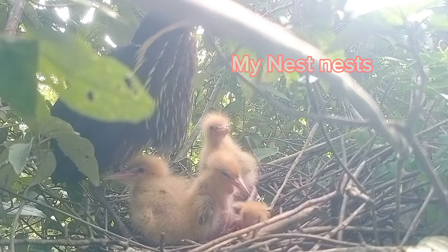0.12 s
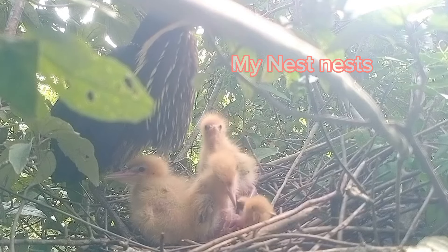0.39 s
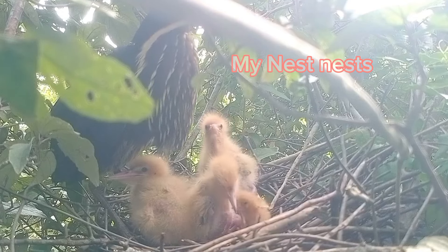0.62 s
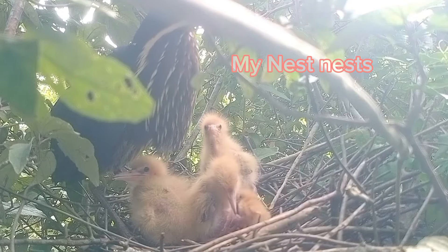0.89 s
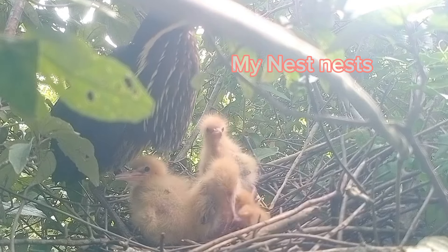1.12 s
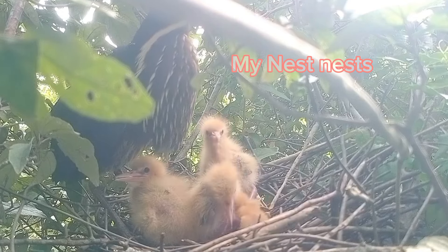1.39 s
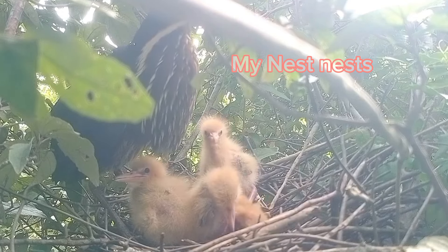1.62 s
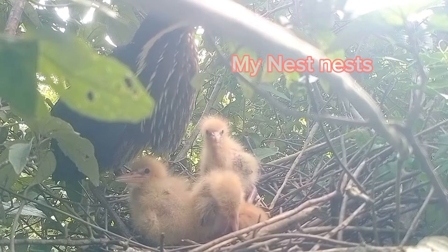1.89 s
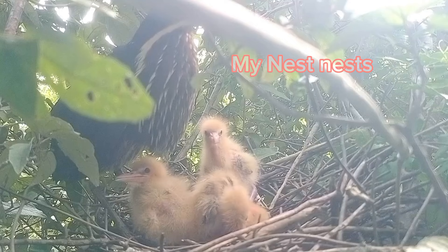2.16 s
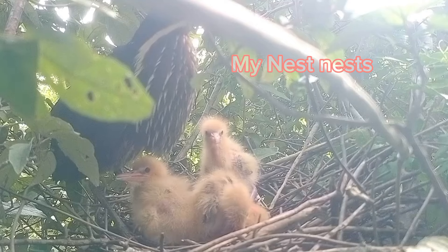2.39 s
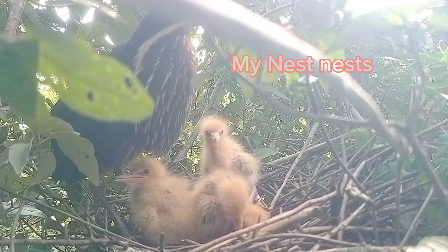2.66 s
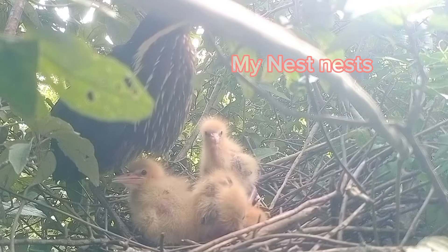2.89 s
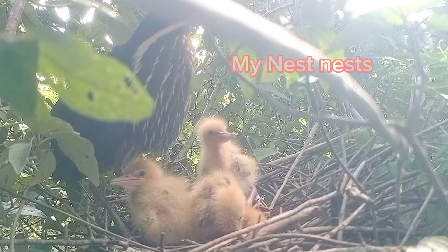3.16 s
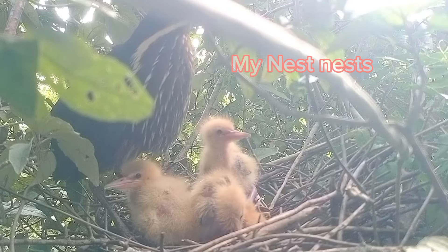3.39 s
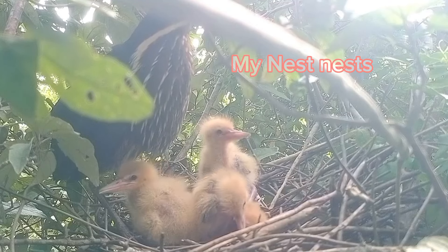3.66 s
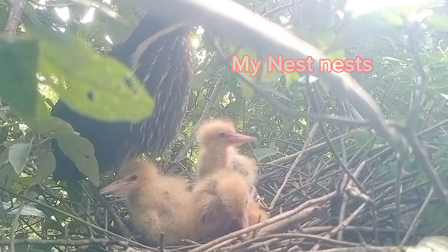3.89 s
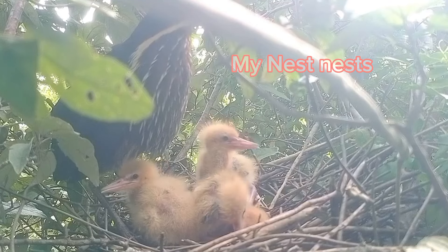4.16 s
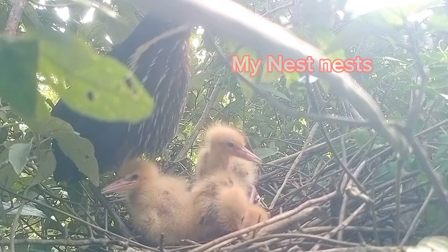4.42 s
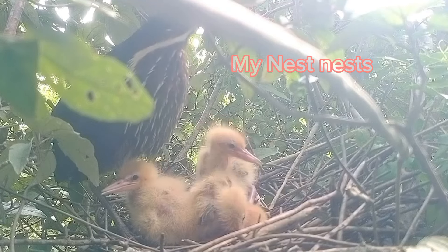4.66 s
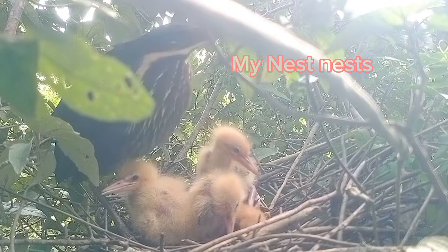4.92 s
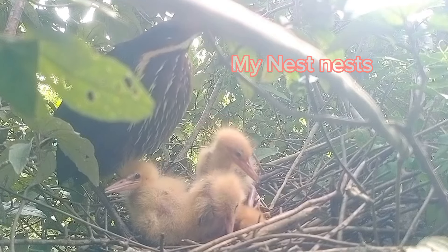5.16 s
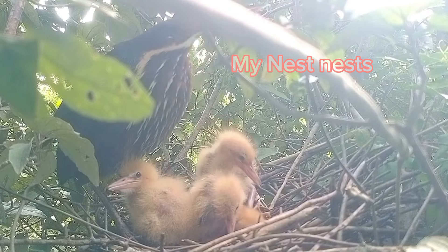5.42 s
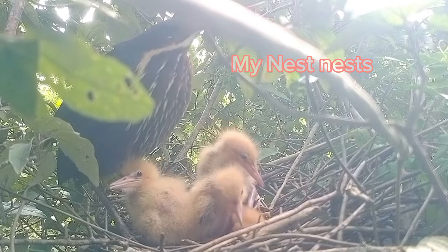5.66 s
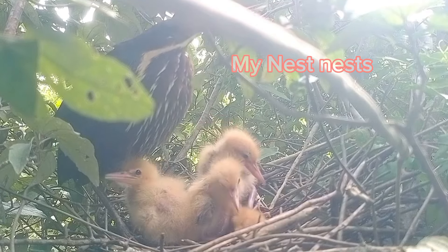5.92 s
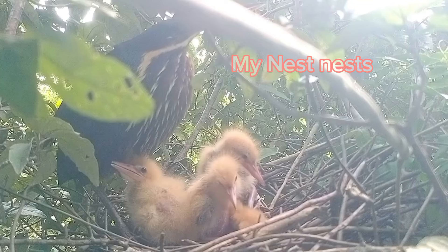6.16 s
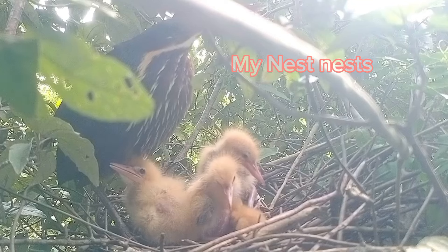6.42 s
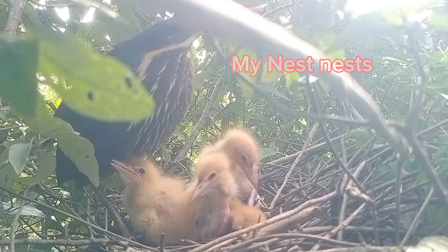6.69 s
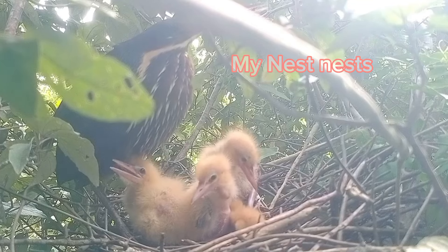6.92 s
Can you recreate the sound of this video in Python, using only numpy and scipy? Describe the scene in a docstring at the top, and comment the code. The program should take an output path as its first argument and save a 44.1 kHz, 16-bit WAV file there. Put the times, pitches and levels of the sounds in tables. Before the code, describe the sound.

High, steady cicada buzzing shimmers outdoors as close birds chack, chirp and burr irregularly, with a brief dry ratchet and faint low wind rumble.

```python
"""A cicada chorus drones and throbs in a leafy thicket on a hot day: dense clicks ring one body resonance.
Small birds nearby chack, whistle, burr and peep, as gliding tones and rasps through throat resonances.
A dry ratchet of ringing clicks and spurts of pulsed buzz cut in. A far bird pips in steady time, mostly as
echoes; faint twitter and a few far insect trills are narrow noise. A treble hiss flickers; below lie gusty
rumble and leaf hiss, made of coloured noise."""
import sys
import numpy as np
from scipy import signal
from scipy.fft import rfft, irfft, next_fast_len
from scipy.io import wavfile

SR = 44100
rng = np.random.default_rng(int(sys.argv[2]) if len(sys.argv) > 2 else 0)


def dump(signal):
    """Clip the signal to [-1, 1] and save it as 16-bit WAV at the path in sys.argv[1]."""
    limited = np.clip(np.atleast_2d(signal).T, -1, 1)
    pcm = np.round(limited * 32767).astype(np.int16)
    wavfile.write(sys.argv[1], SR, pcm)


def elevation(decibels):
    """Turn decibel levels (scalar or array-like) into linear amplitude ratios."""
    levels = np.asarray(decibels, float)
    return 10 ** (levels / 20)


N = 310905  # length in samples

# Spectrum of the cicada body. Each row: frequency in Hz, relative density in dB per Hz.
CICADA_BODY = [(3820, -76), (6500, -37), (6740, -10), (6830, -16), (6920, -20.5), (7110, 6), (7390, 10.5),
               (7590, 14), (7980, -7.5), (8150, -13), (8270, -14), (8790, -26.5), (9200, -115.5),
               (12000, -143), (20200, -120)]
# Nearer cicadas, standing out as narrow peaks. Each row: frequency in Hz, width in Hz, level in dB.
NEAR_SINGERS = [(7130, 180, -15.5), (7300, 100, -18.5), (7230, 63, -19), (7750, 52, -16.5),
                (7760, 42, -12.5), (7811, 88, -10.5)]
# Throbs of the whole chorus, at several paces. Each row: throbs per second, lag in throbs, power depth 0-1.
THROBS = [(11.39, 0.32, .3), (11.6, 0.35, 0.11), (11.8, 0.6, 0.1), (12.35, 0.23, 0.15)]
CHORUS_DB, CHORUS_DRIFT_DB, CHORUS_FLUTTER_DB = -44.5, 0.7, 0.5  # level, slow drift, quick flutter

# Harsh chacks. Each row: start in seconds, level in dB, middle resonances in dB, top resonances in dB.
CHACKS = [(0.888, -30.5, -3.5, -10), (1.3611, -33.5, -5, -7), (2.333, -35, 1.5, -3), (2.722, -29, -4, -7),
          (3.1196, -27, -7.5, -4.5), (4.1469, -28.5, -6.5, -9), (4.59, -30.5, -7, -8),
          (5.8871, -32, -6.5, -6), (6.272, -36, -4, -1.5), (6.6081, -30.5, -3.5, -3.5),
          (7.033, -31, 0.5, 0)]
# Chack throat, in low, middle and top groups. Each row: frequency in Hz, width in Hz, level in dB.
CHACK_THROAT = [
    [(2050, 480, -4.5), (2500, 420, 5.5), (2907, 310, 4.5)],
    [(4210, 370, -1), (4625, 300, 6)],
    [(5690, 130, -3.5), (6100, 150, 1.5)],
]
CHACK_S, CHACK_TONE_DB = 0.043, -43  # length in seconds; level of the opening tone

# Rising whits. Each row: start in seconds, start in Hz, end in Hz, level in dB, overtones in dB.
WHITS = [(.540, 1604, 2544, -30, -14), (.982, 2160, 2305, -40, -25), (1.848, 1510, 2394, -33, -18),
         (2.353, 2056, 2596, -28.5, -18), (3.718, 2050, 2580, -30.5, -25), (3.834, 1550, 2180, -32.5, -4),
         (4.978, 1960, 2640, -33.5, -22), (5.077, 1536, 1950, -34, -3.5), (5.874, 2150, 2550, -28.5, -3.5),
         (6.644, 2020, 2620, -32.5, -20)]
# Burred tails after most whits. Each row: start in seconds, level in dB, top resonance in dB.
BURRS = [(0.5461, -35, -21), (1.8542, -34, -27), (2.3589, -40, -13), (3.8402, -33.5, -7),
         (5.0837, -43.5, -4), (5.8797, -44.5, -8), (6.6496, -50, -21.5)]
# Throat of the burr. Each row: frequency in Hz, width in Hz, level in dB.
BURR_THROAT = [(2450, 420, 0.5), (3050, 1100, -14.5), (3940, 420, -13.5)]
# Small peeps. Each row: start in seconds, length in seconds, start in Hz, end in Hz, level in dB.
PEEPS = [(0.151, 0.019, 2680, 2686, -55.5), (0.399, 0.043, 1963, 1890, -49),
         (0.989, 0.029, 2450, 2150, -44.5), (1.169, 0.018, 2150, 2150, -55.5),
         (1.644, 0.035, 2800, 2690, -48), (1.905, 0.06, 3080, 3110, -53.5),
         (1.969, 0.069, 2580, 2500, -58.5), (2.39, 0.017, 2330, 2050, -46),
         (3.22, 0.023, 3370, 3050, -47.5), (3.246, 0.011, 2020, 1815, -49.5),
         (3.728, 0.017, 2790, 2740, -41), (3.753, 0.023, 2340, 2260, -48.5),
         (4.249, 0.041, 2436, 2240, -46.5), (4.26, 0.023, 2880, 2600, -51.5),
         (4.259, 0.03, 5500, 5240, -54), (4.79, 0.016, 3320, 3170, -41), (4.802, 0.023, 3100, 2670, -59),
         (4.992, .045, 2490, 1907, -40.5), (5.013, 0.027, 1870, 1816, -48), (5.085, 0.024, 2545, 2450, -39),
         (5.158, 0.017, 3230, 2950, -49), (5.209, 0.051, 1430, 1325, -57), (5.21, 0.023, 2620, 2700, -48.5),
         (5.627, 0.039, 3120, 2354, -39.5), (5.715, 0.043, 2200, 2000, -57),
         (5.908, 0.018, 2450, 2063, -39.5), (6.662, 0.063, 2500, 2150, -40),
         (6.922, 0.076, 2700, 2500, -56)]
# Peep overtones are strongest at this pitch and fade for other pitches.
RICH_HZ, RICH_DB, PURER_DB_PER_OCTAVE = 2000, -4.5, 38
# Windpipe, lifting overtones that pass through. Each row: frequency in Hz, half width in Hz, lift in dB.
WINDPIPE = [(3880, 360, 1.5), (5680, 970, -0.5)]

# Spurts of a dry pulsed buzz. Each row: start in seconds, length in seconds, level in dB.
BUZZ = [(6.731, 0.066, -49.5), (6.817, 0.0076, -57)]
# Throat of the buzz. Each row: frequency in Hz, width in Hz, level in dB.
BUZZ_THROAT = [(2150, 400, -2), (3040, 680, 1), (4580, 370, -1), (5230, 300, 3), (5770, 480, 7)]

# Single clicks of the dry ratchet, mostly strong. Each row: time in seconds, level in dB.
CLICKS = [(3.1302, -26), (3.1604, -32), (3.1768, -26), (3.1947, -31), (3.2074, -31), (3.2224, -33),
          (3.2268, -37)]
# Modes that each click rings. Each row: frequency in Hz, width in Hz, level in dB.
RATCHET_MODES = [(3740, 260, -11), (4850, 970, -2), (5500, 870, -1.5), (6200, 600, -13), (7020, 210, 2.5)]
# A nearly even run of clicks fills the ratchet.
RUN_START_S, RUN_EVERY_S, RUN_DB = 3.139, 0.0076, -35
SCRAPE_S, SCRAPE_DB = 0.096, -54  # a dry scrape under the clicks: length, level
SNAP_START_S, SNAP_S, SNAP_DB = 3.25, 0.0061, -32.5  # the ratchet ends in a dense snap

FIRST_PIP_S, PIP_EVERY_S, PIP_DB, PIP_SPREAD_DB = 2.4, 0.257, -62.5, 2
# Far insect trills. Each row: start in seconds, length in seconds, frequency in Hz, width in Hz, level in dB.
TRILLS = [(1.356, 0.34, 9510, 300, -57), (1.4, 0.15, 6200, 80, -71), (1.684, .2, 6300, 80, -76),
          (3.554, 0.11, 4840, 150, -66.5), (4.1, 0.15, 5500, 200, -64), (4.426, 0.28, 5500, 130, -74),
          (4.836, .14, 5400, 130, -75), (5.196, .13, 5500, 130, -74)]
FOLIAGE_T60_S, FOLIAGE_DB = 0.095, -11  # time to die by 60 dB; echo level

# Flickering treble hiss. Each row: frequency in Hz, relative density in dB per Hz.
TREBLE = [(6820, -92), (11600, 0), (12200, 12), (12700, 8), (14600, 7), (15600, 7.5)]
# Swells of the treble hiss. Each row: start in seconds, length in seconds, level in dB.
TREBLE_SWELLS = [(0.166, .29, -65), (0.88, 0.037, -58), (1.173, 0.058, -61), (1.302, 0.42, -64.5),
                 (2.136, 0.24, -61.5), (2.6, 0.17, -64), (2.85, .42, -67.5), (3.46, 0.39, -65),
                 (3.82, .26, -70), (4.137, 0.027, -58), (4.24, 0.03, -58), (4.407, 0.26, -62.5),
                 (5.01, 0.32, -65), (5.655, 0.26, -66), (6.11, 0.2, -71), (6.382, .33, -64),
                 (7.004, .05, -63)]
TREBLE_LULL_DB, TREBLE_FLICKER_DB, TREBLE_EDGE_S = -65, 2.1, 0.02
# Thin, more even hiss below the flicker. Each row: frequency in Hz, relative density in dB per Hz.
THIN_HISS = [(9800, -90), (10200, -52), (10400, -5), (11500, -4), (11800, -17)]
THIN_HISS_DB = -81

# Rumble and leaf hiss. Each row: frequency in Hz, relative density in dB per Hz.
AIR = [(15, -59), (25, -17), (55, -15), (80, -2.5), (179, -1), (291, -9.5), (432, -17.5), (508, -18.5),
       (626, -21.5), (1440, -19.5), (1990, -26.5), (2690, -23.5), (2960, -26), (4490, -28), (4920, -33.5),
       (6350, -29.5), (8260, -19.5), (14000, -120)]
HISS_DB = -54.5  # level of the leaf hiss, counted on the noise before it is filtered
# Gusts of low rumble. Each row: time of the top in seconds, level in dB.
GUSTS = [(0.0, -45.5), (0.43, -49), (1.25, -49.5), (1.48, -48), (1.71, -49), (1.92, -53), (2.36, -52.5),
         (2.65, -51.5), (2.8, -45.5), (3.12, -48.5), (3.53, -54), (4.02, -51), (4.2, -48.5), (4.59, -54),
         (4.71, -52), (5.52, -49.5), (5.93, -48), (6.22, -48.5), (6.33, -47), (6.94, -49)]
GUST_S, RUMBLE_DB, RUMBLE_DRIFT_DB = 0.038, -61, 2.5  # half length of a gust; the rumble between gusts


def rms_one(x):
    """Scale to rms 1."""
    return x / np.sqrt(np.mean(x ** 2) + 1e-20)


def coloured(x, spectrum):
    """Give a white signal a spectrum; rms 1."""
    hz, db = np.transpose(spectrum)
    size = next_fast_len(N)
    grid = np.maximum(np.arange(size // 2 + 1) * SR / size, 1)
    gain = elevation(np.interp(np.log(grid), np.log(hz), db))
    return rms_one(irfft(rfft(x, size) * gain, size)[:N])


def drift(rate, size):
    """Chance wandering at about this rate in Hz, rms 1."""
    r = np.exp(-2 * np.pi * rate / SR)
    noise = rng.standard_normal(size + SR)
    return rms_one(signal.lfilter([1], [1, -2 * r, r * r], noise)[SR:])


def resonate(x, hz, width):
    """A resonance applied twice: dark skirts."""
    r = np.exp(-np.pi * width / SR)
    section = [(1 - r * r) / 2, 0, (r * r - 1) / 2, 1, -2 * r * np.cos(2 * np.pi * hz / SR), r * r]
    return signal.sosfilt([section, section], x)


def swell(length, rise, fall):
    """Time axis and an envelope that rises, holds and dies away."""
    t = np.arange(int((length + 5 * fall) * SR)) / SR
    return t, np.clip(t / rise, 0, 1) ** 2 * np.exp(-np.maximum(t - length, 0) / fall)


def add(out, s, sound):
    """Mix a sound in at time s."""
    i = round(s * SR)
    out[i:i + len(sound)] += sound[:max(N - i, 0)]


def cicadas():
    """Dense tymbal clicks of many singers ring one body; the whole chorus throbs at several paces."""
    t = np.arange(N) / SR
    throb = 1 + sum(depth * np.cos(2 * np.pi * (per_s * t - lag)) for per_s, lag, depth in THROBS)
    level_db = CHORUS_DB + CHORUS_DRIFT_DB * drift(0.58, N) + CHORUS_FLUTTER_DB * drift(22, N)
    buckles = (rng.random(N) < 9000 / SR) * rng.standard_normal(N)  # about 9000 clicks per second
    near = np.zeros(N)
    for hz, width, db in NEAR_SINGERS:
        near += elevation(db) * rms_one(resonate(buckles, hz, width)) * elevation(1.9 * drift(4.4, N))
    near = signal.sosfilt(signal.butter(5, [6900, 8100], "band", fs=SR, output="sos"), near)
    chorus = rms_one(coloured(buckles, CICADA_BODY) + near)
    return elevation(level_db) * np.sqrt(np.maximum(throb, 0.05)) * chorus


def whistle(length, start_hz, end_hz, overtones_db, rise, fall, wobble, bright_s):
    """A syrinx tone gliding in pitch, unsteady in level; its two overtones flutter and fade within bright_s."""
    t, shape = swell(length, rise, fall)
    hz = start_hz + (end_hz - start_hz) * np.clip(t / length, 0, 1.15) ** 1.09
    phase = 2 * np.pi * np.cumsum(hz * (1 + 0.011 * drift(37, len(t)))) / SR
    tone = np.sin(phase) * elevation(wobble * drift(250, len(t)))
    for multiple in (2, 3):
        lift = 0.15
        for pipe_hz, half_hz, db in WINDPIPE:
            lift = lift + elevation(db) * np.exp(-((multiple * hz - pipe_hz) / half_hz) ** 2)
        flutter = elevation(overtones_db + 5.5 * drift(170, len(t)))
        tone += lift * flutter * np.exp(-(t / bright_s) ** 2) * np.sin(multiple * phase)
    return shape * tone


def rasp(size, per_s, breath):
    """Uneven syrinx pulses mixed with breath noise; rms 1."""
    count = np.cumsum(per_s * (1 + 0.27 * drift(80, size))) / SR
    pulses = np.diff(np.floor(count), prepend=0) * elevation(rng.standard_normal(size))
    return rms_one(rms_one(pulses) + breath * rng.standard_normal(size))


def throat(source, resonances):
    """Parallel resonances with alternating signs; rms 1."""
    voice = np.zeros(len(source))
    for k, (hz, width, db) in enumerate(resonances):
        voice += (-1) ** k * elevation(db) * resonate(source, hz, width)
    return rms_one(voice)


def arch(t, length, low_hz, top_hz):
    """A hoarse partial that climbs and sinks, chopped by a slower membrane; rms 1."""
    hz = low_hz + (top_hz - low_hz) * np.sin(np.pi * np.clip(t / length, 0, 1))
    phase = 2 * np.pi * np.cumsum(hz * (1 + 0.058 * drift(95.6, len(t)))) / SR
    membrane = 2 * np.pi * np.cumsum(270 * (1 + 0.23 * drift(87, len(t)))) / SR
    chop = 1 + 0.2 * np.cos(membrane)
    return rms_one(np.sin(phase) * chop * elevation(0.86 * drift(65, len(t))))


def chacks():
    """A faint tick, a short clear tone, an arched rasp through the throat, and a tone as the beak closes."""
    out = np.zeros(N)
    for s, db, middle_db, top_db in CHACKS:
        t, shape = swell(CHACK_S, rise=0.0074, fall=0.006)
        source = rasp(len(t), per_s=260, breath=0.47)
        groups = zip((0, middle_db, top_db), CHACK_THROAT)
        voice = sum(elevation(level_db) * throat(source, group) for level_db, group in groups)
        partials = arch(t, CHACK_S, 2476, 2780) + elevation(middle_db) * arch(t, CHACK_S, 4400, 4750)
        add(out, s, elevation(db - 7) * (0.65 * voice + 0.74 * partials) * shape * np.exp(-t / 0.05))
        opening = whistle(0.0077, 1987, 2027, -7, rise=0.0056, fall=0.0054, wobble=2.1, bright_s=0.036)
        add(out, s - 0.002, elevation(CHACK_TONE_DB) * opening)
        closing = whistle(0.0185, 2124, 1977, -8.5, rise=0.0044, fall=0.0037, wobble=1.8, bright_s=0.036)
        add(out, s + CHACK_S - 0.004, elevation(CHACK_TONE_DB - 11) * closing)
        tick = voice[:60] * np.hanning(60)
        add(out, s - 0.012, elevation(db - 11) * tick)
    return out


def whits():
    """A quick upward glide of the syrinx tone."""
    out = np.zeros(N)
    for s, start_hz, end_hz, db, overtones_db in WHITS:
        glide = whistle(0.01405, start_hz, end_hz, overtones_db,
                        rise=0.0034, fall=0.0032, wobble=2.25, bright_s=0.012)
        add(out, s - 0.002, elevation(db) * glide)
    return out


def burrs():
    """The glide breaks into a hoarse burr: a rasp through the throat with an arched partial."""
    out = np.zeros(N)
    for s, db, top_db in BURRS:
        t, shape = swell(0.038, rise=0.0018, fall=0.012)
        source = rasp(len(t), per_s=260, breath=0.76)
        voice = 0.85 * throat(source, BURR_THROAT) + 0.95 * arch(t, 0.0596, 2583, 3100)
        voice += elevation(top_db) * throat(source, [(5300, 1100, 0)])
        add(out, s, elevation(db) * voice * shape * np.exp(-t / 0.016))
    return out


def peeps():
    """Soft single notes of several birds, dying as they glide."""
    out = np.zeros(N)
    for s, length, start_hz, end_hz, db in PEEPS:
        overtones_db = RICH_DB - PURER_DB_PER_OCTAVE * abs(np.log2(start_hz / RICH_HZ))
        note = whistle(length, start_hz, end_hz, overtones_db,
                       rise=0.0053, fall=0.0045, wobble=3.3, bright_s=0.04)
        decay = np.exp(-np.arange(len(note)) / (0.036 * SR))
        add(out, s, elevation(db) * note * decay)
    return out


def buzz():
    """Uneven pulses and breath through a wide-open throat."""
    out = np.zeros(N)
    for s, length, db in BUZZ:
        t, shape = swell(length, rise=0.0021, fall=0.004)
        source = rasp(len(t), per_s=210, breath=1.0)
        add(out, s, elevation(db) * shape * throat(source, BUZZ_THROAT))
    return out


def ratchet():
    """Each click rings a few short bright modes; a scrape and a closing snap share those modes."""
    clicks = np.full(N, 1e-18)
    run = []
    for k, (late, size) in enumerate(rng.standard_normal((10, 2))):
        run.append((RUN_START_S + RUN_EVERY_S * (k + 0.12 * late), RUN_DB + 2.1 * size))
    for s, db in CLICKS + run:
        clicks[round(s * SR)] = elevation(db + 22.5)  # makes up for the level lost in the resonances
    out = np.zeros(N)
    for k, (hz, width, db) in enumerate(RATCHET_MODES):
        out += (-1) ** k * elevation(db) * resonate(clicks, hz, width)
    t, shape = swell(SCRAPE_S, rise=0.012, fall=0.012)
    add(out, RUN_START_S, elevation(SCRAPE_DB) * shape * throat(rng.standard_normal(len(t)), RATCHET_MODES))
    t, shape = swell(SNAP_S, rise=0.0019, fall=0.0021)
    snap = throat(rasp(len(t), per_s=450, breath=0.86), RATCHET_MODES)
    add(out, SNAP_START_S, elevation(SNAP_DB) * shape * snap)
    return out


def foliage(x):
    """Scattered echoes from leaves and stems: a short dying noise."""
    t = np.arange(SR // 4) / SR
    scatter = rng.standard_normal(len(t)) * elevation(-60 * t / FOLIAGE_T60_S) * np.clip(t / 0.0056, 0, 1)
    scatter = scatter / np.sqrt(np.sum(scatter ** 2))
    return elevation(FOLIAGE_DB) * signal.fftconvolve(x, scatter)[:N]


def pips():
    """The far bird's note, evenly repeated, arrives mostly as echoes."""
    out = np.zeros(N)
    for s in np.arange(FIRST_PIP_S, N / SR, PIP_EVERY_S):
        db = PIP_DB + PIP_SPREAD_DB * rng.standard_normal()
        note = whistle(0.0278, 3780, 4020, -40, rise=0.0076, fall=0.0094, wobble=5.8, bright_s=0.01)
        add(out, s - 0.01, elevation(db) * note)
    return 0.15 * out + elevation(9.5) * foliage(out)


def twitter():
    """Barely heard birds all round: blurred blips at chance times and pitches."""
    out = np.zeros(N)
    for when, pitch, size in rng.random((70, 3)):
        t, shape = swell(0.024, rise=0.02, fall=0.013)
        blip = resonate(rng.standard_normal(len(t)), 1200 * 4.5 ** pitch, 140)
        add(out, when * N / SR, elevation(-71 - 6 * pitch + 8.5 * size) * shape * rms_one(blip))
    return out


def trills():
    """Far wing-rubbing blurs into a narrow band of noise."""
    out = np.zeros(N)
    for s, length, hz, width, db in TRILLS:
        t, shape = swell(length, rise=0.039, fall=0.011)
        band = rms_one(resonate(rng.standard_normal(len(t)), hz, width))
        add(out, s, elevation(db) * shape * band)
    return out


def treble():
    """Faint noise at the top, swelling and flickering above a more even thin hiss."""
    level = np.full(N, elevation(TREBLE_LULL_DB))
    for s, length, db in TREBLE_SWELLS:
        t, shape = swell(length + TREBLE_EDGE_S, rise=2 * TREBLE_EDGE_S, fall=TREBLE_EDGE_S)
        add(level, s - TREBLE_EDGE_S, elevation(db) * shape)
    flicker = level * elevation(TREBLE_FLICKER_DB * drift(24, N)) * coloured(rng.standard_normal(N), TREBLE)
    thin = elevation(THIN_HISS_DB + 1.8 * drift(21, N)) * coloured(rng.standard_normal(N), THIN_HISS)
    return flicker + thin


def air():
    """Coloured noise split in two: rumble in gusts and narrow lumps, and a smoother hiss above it."""
    steady = coloured(rng.standard_normal(N), AIR)
    low = signal.sosfilt(signal.butter(2, 140, fs=SR, output="sos"), steady)
    lumps = 0.44 * low
    for hz in np.geomspace(66, 170, 5):
        lumps += elevation(2.7 * drift(7.9, N)) * resonate(low, hz, 0.34 * hz)
    hiss = signal.sosfilt(signal.butter(8, 6300, fs=SR, output="sos"), steady - low)
    steps = np.arange(0, N, 100) / SR  # gusts are slow, so a coarse time grid will do
    gusts = sum(elevation(db) * np.exp(-((steps - s) / GUST_S) ** 2) for s, db in GUSTS)
    gusts = np.interp(np.arange(N) / SR, steps, gusts)
    rumble_level = gusts + elevation(RUMBLE_DB + RUMBLE_DRIFT_DB * drift(3.5, N))
    return elevation(HISS_DB + 1.73 * drift(19.2, N)) * hiss + rumble_level * rms_one(lumps)


def scene():
    """All sources, one channel; the birds are dull above 6.4 kHz, and the farther peeps echo more."""
    chorus = cicadas()
    farther = peeps()
    birds = chacks() + whits() + burrs() + buzz() + farther + elevation(2.0) * foliage(farther)
    birds = signal.sosfilt(signal.butter(6, 6400, fs=SR, output="sos"), birds)
    near = birds + ratchet()
    mix = chorus + near + foliage(near) + pips() + twitter() + trills() + treble() + air()
    return mix[None]


def top_cut(x):
    """Nothing passes above the cut-off."""
    return signal.sosfilt(signal.butter(12, 15710, fs=SR, output="sos"), x)


def record(dry):
    """Pass on the finished mix."""
    return top_cut(dry)


dry = scene()
out = record(dry)
dump(out)
```